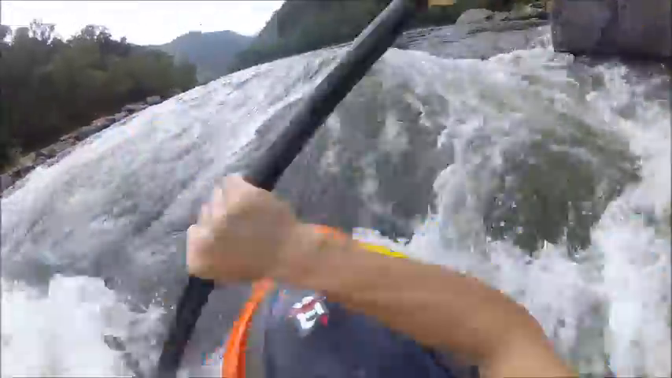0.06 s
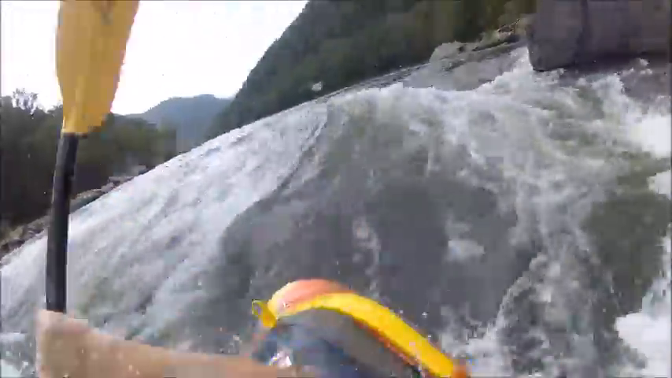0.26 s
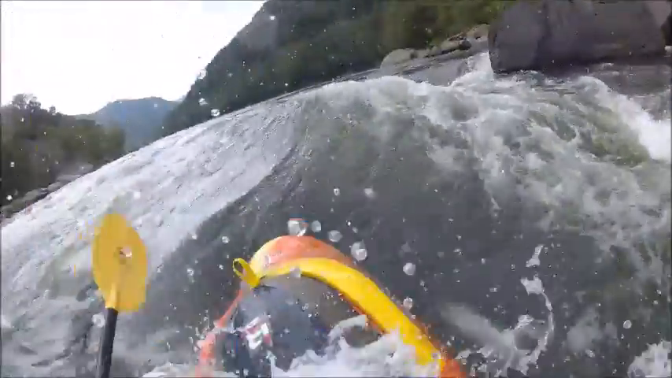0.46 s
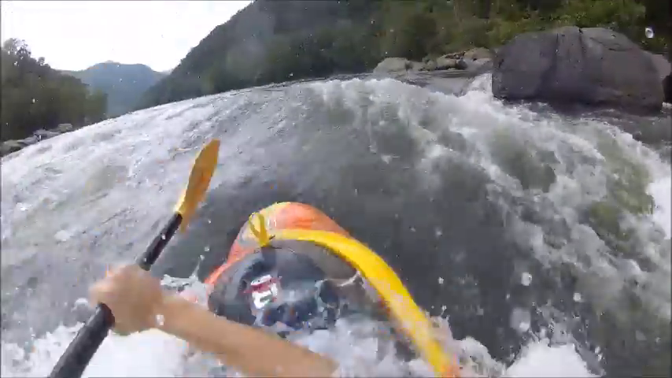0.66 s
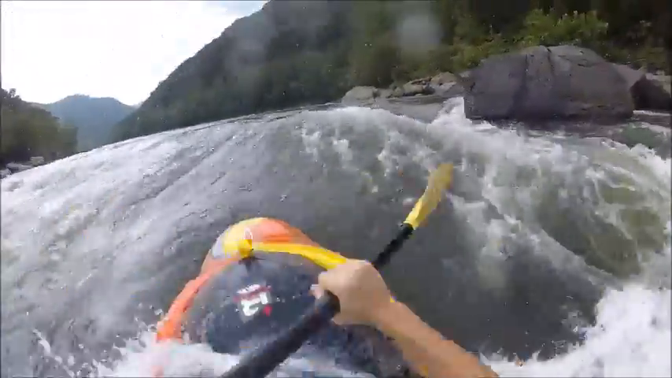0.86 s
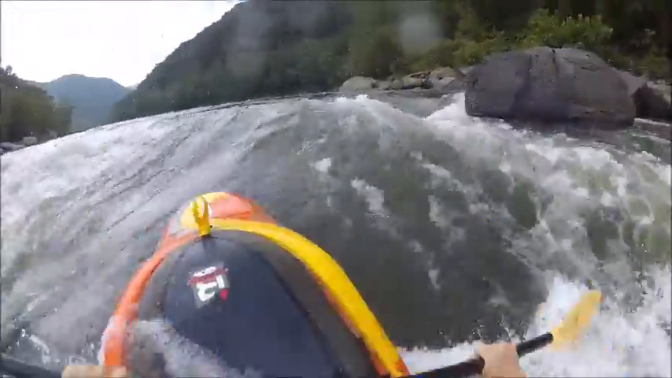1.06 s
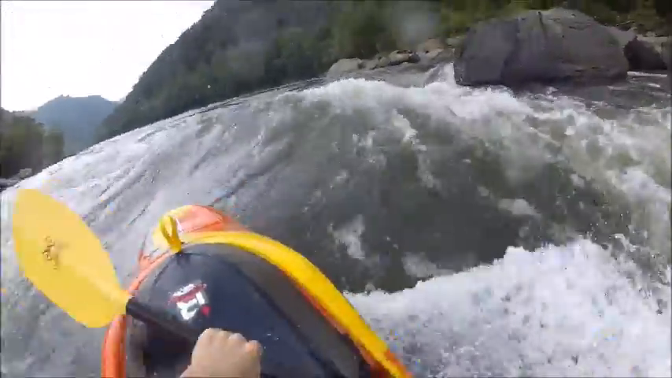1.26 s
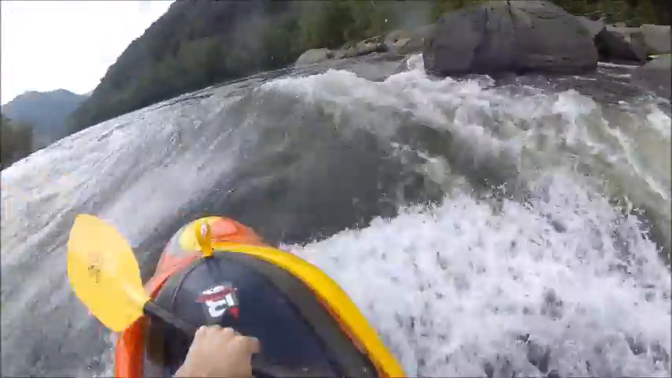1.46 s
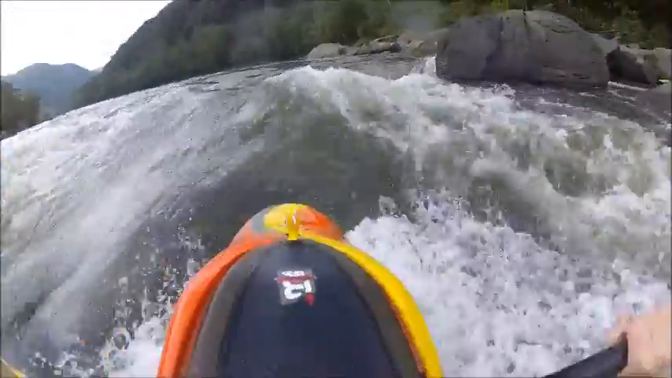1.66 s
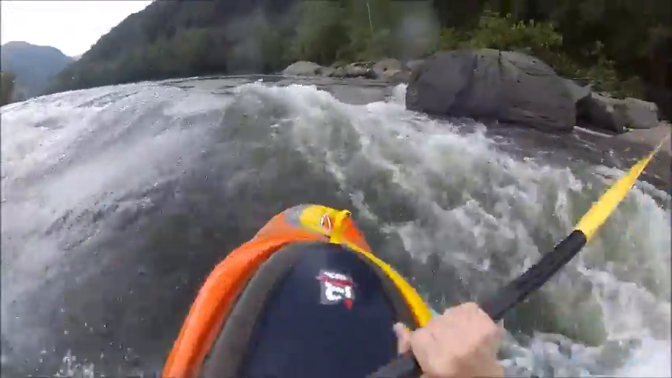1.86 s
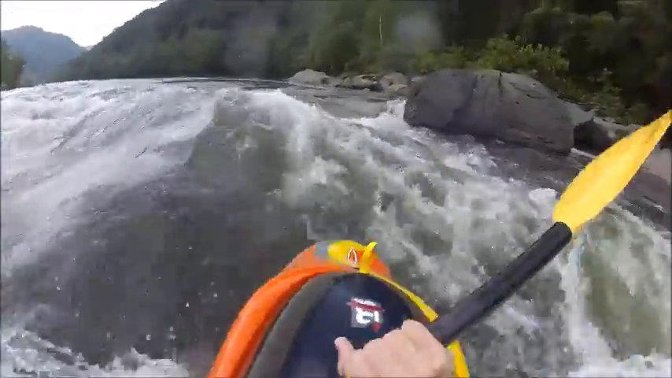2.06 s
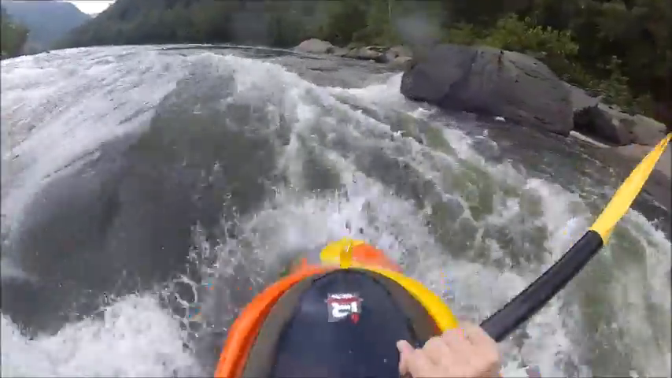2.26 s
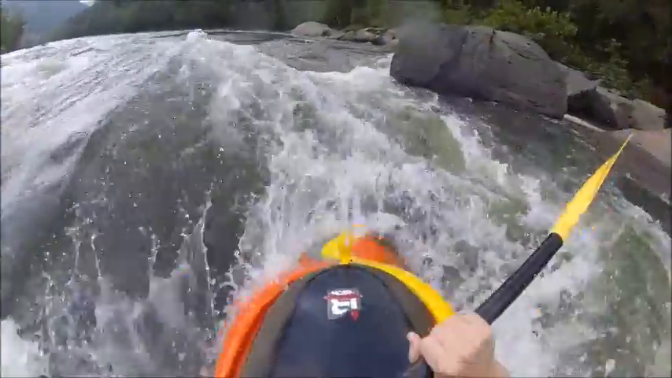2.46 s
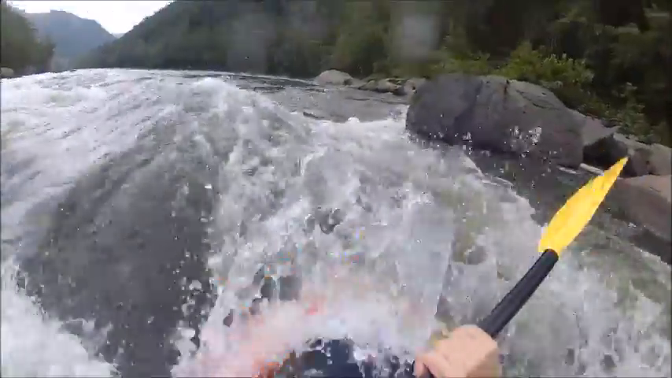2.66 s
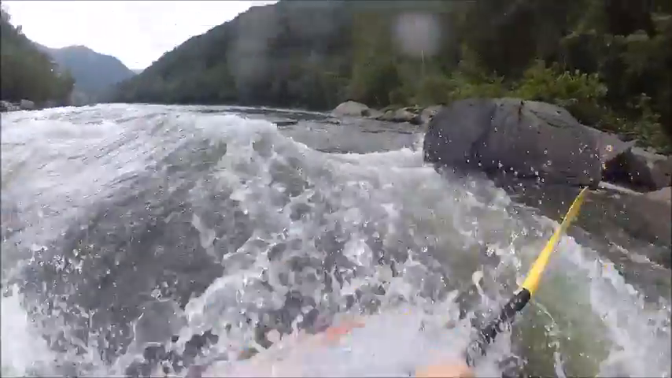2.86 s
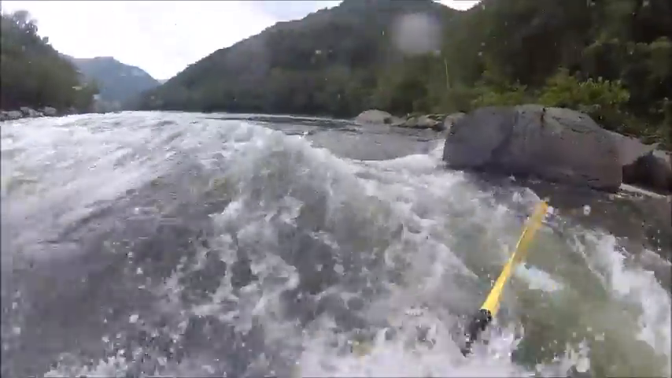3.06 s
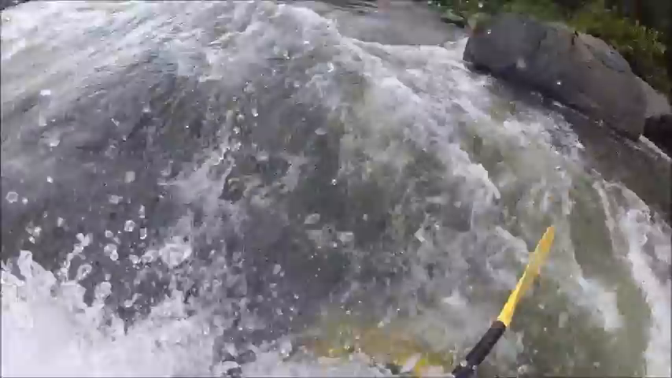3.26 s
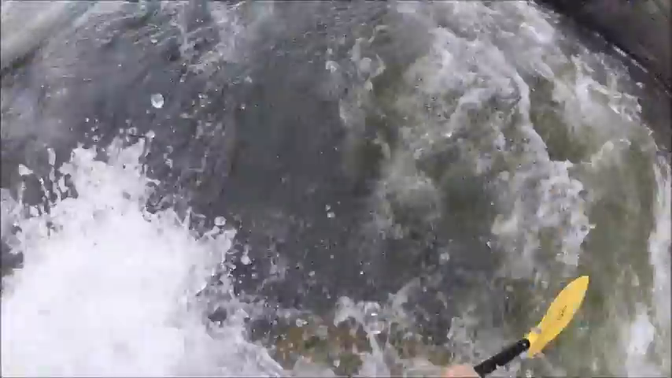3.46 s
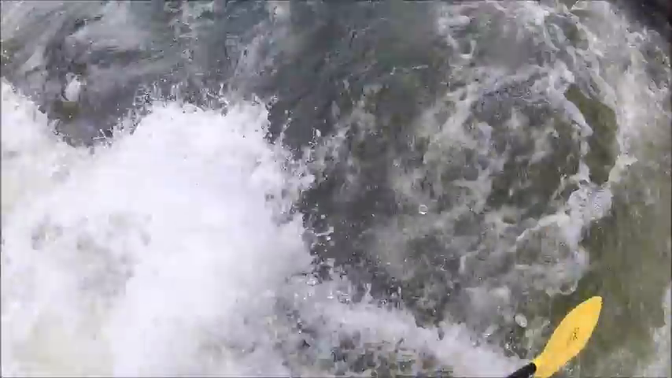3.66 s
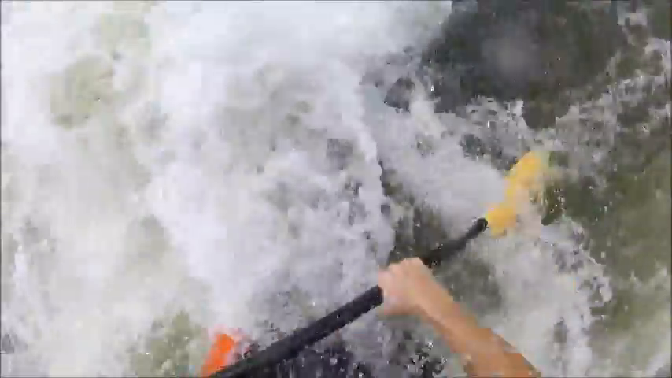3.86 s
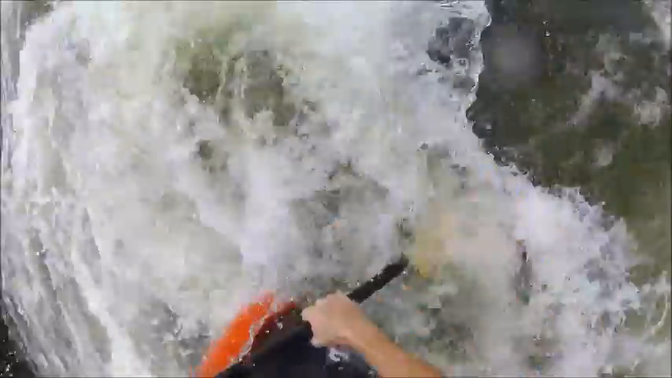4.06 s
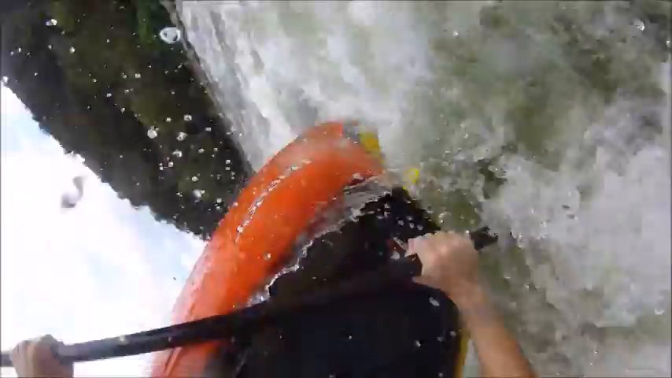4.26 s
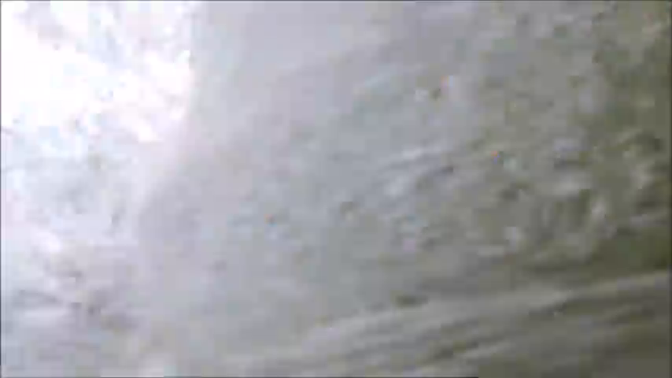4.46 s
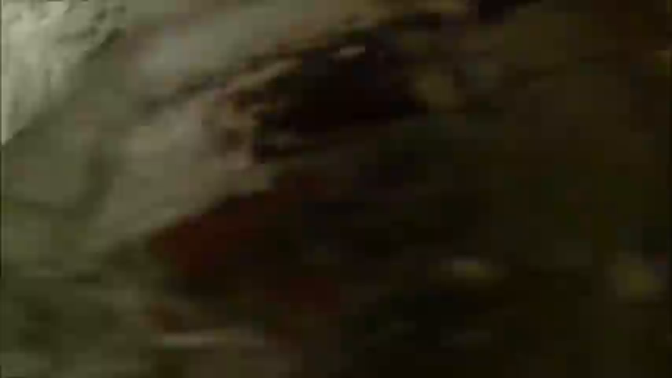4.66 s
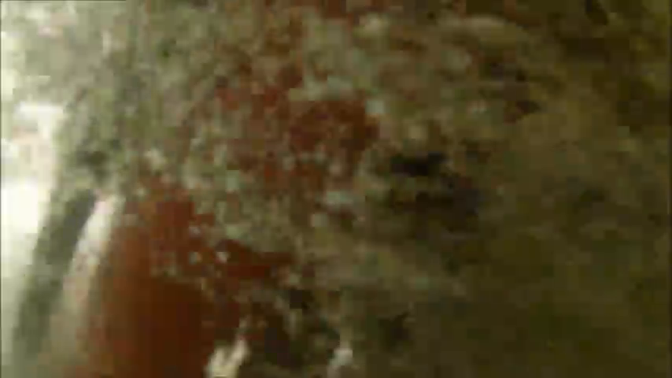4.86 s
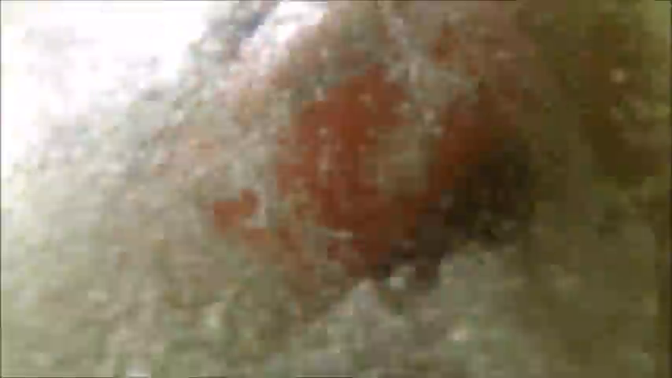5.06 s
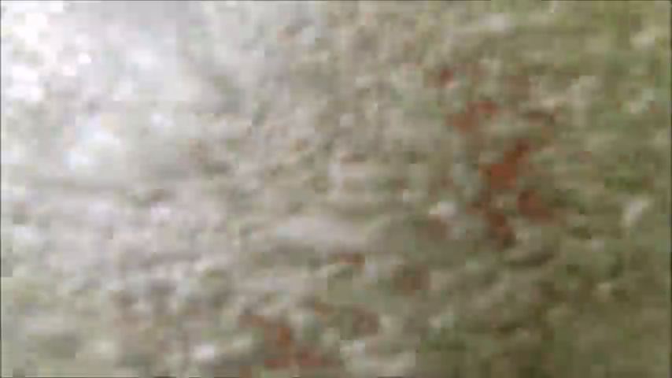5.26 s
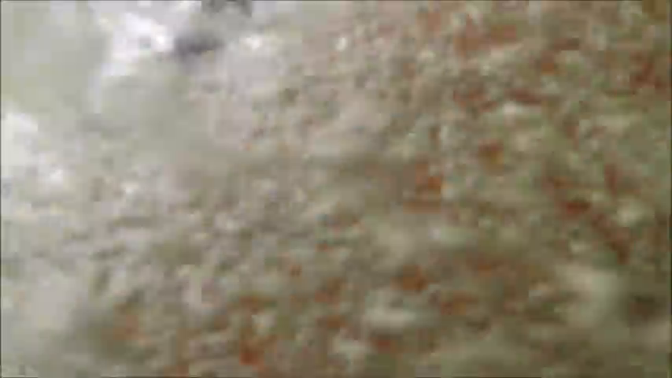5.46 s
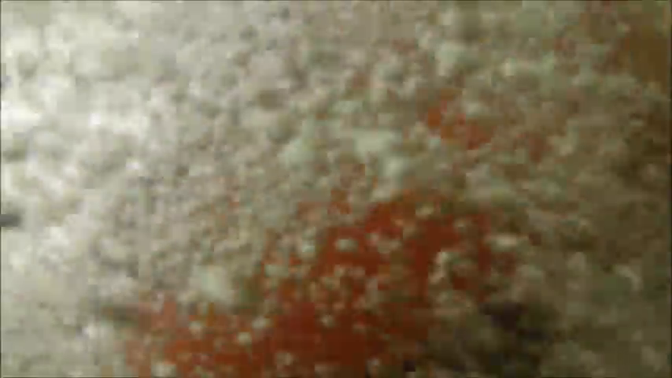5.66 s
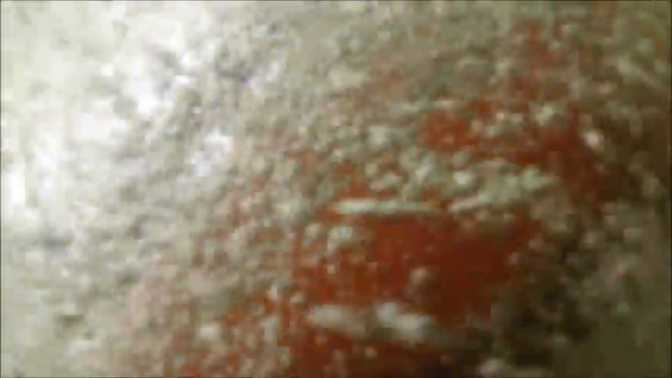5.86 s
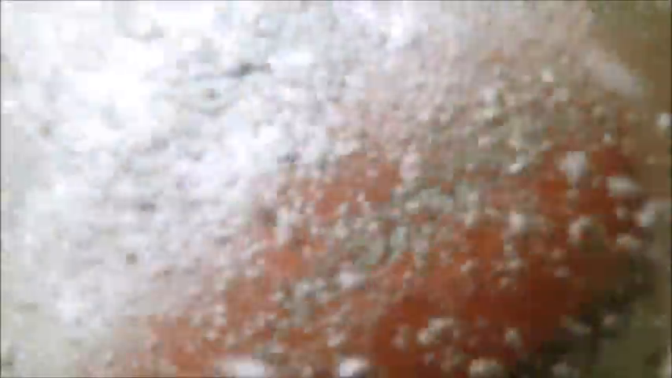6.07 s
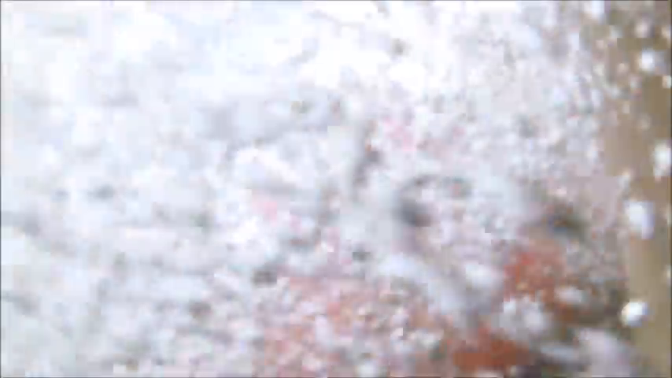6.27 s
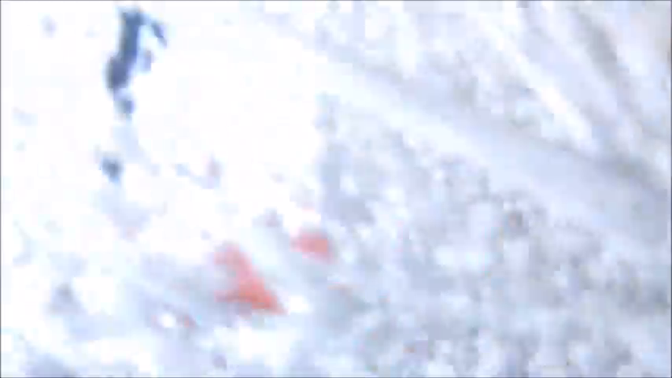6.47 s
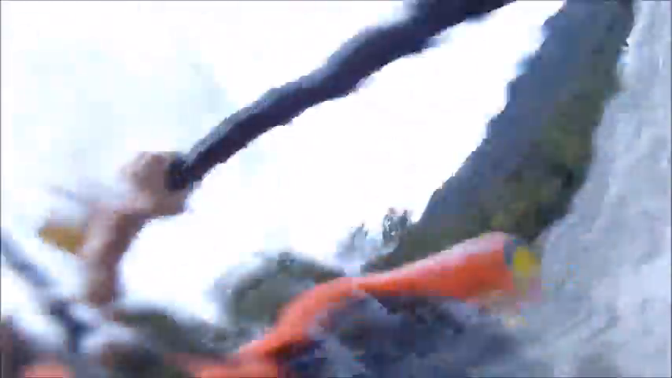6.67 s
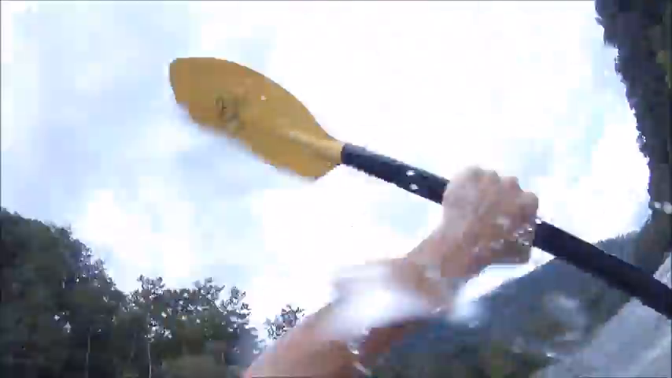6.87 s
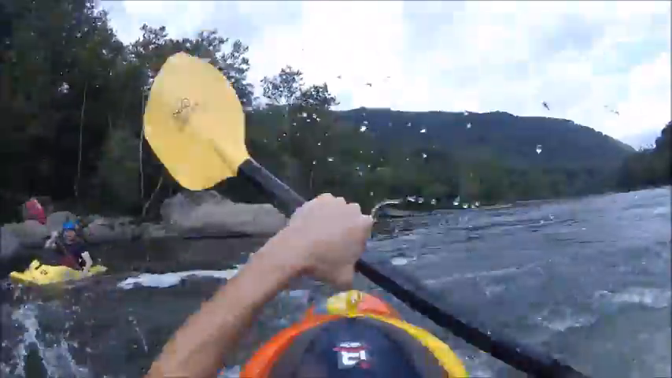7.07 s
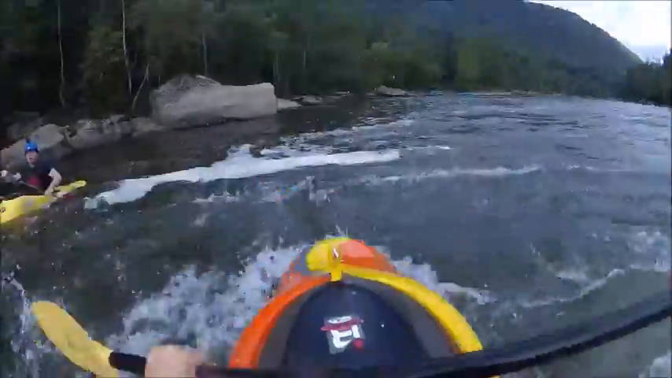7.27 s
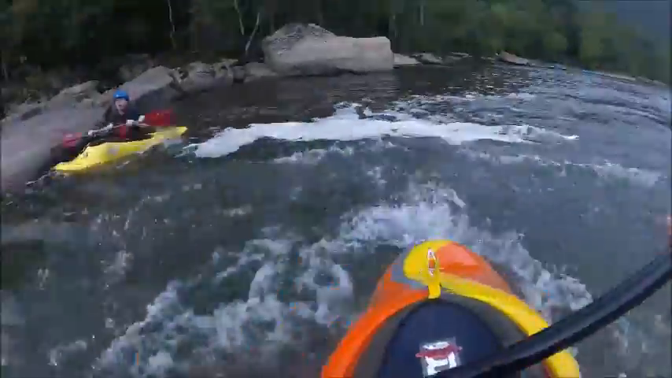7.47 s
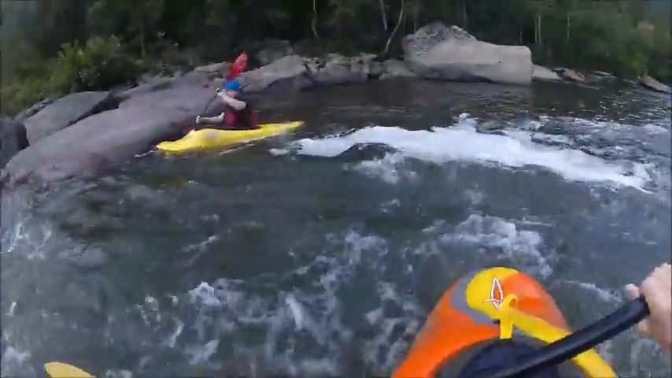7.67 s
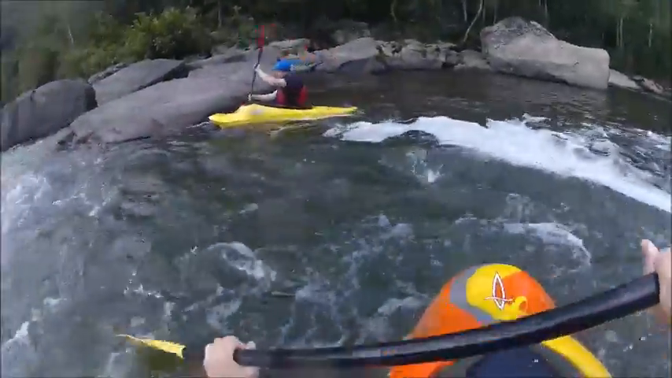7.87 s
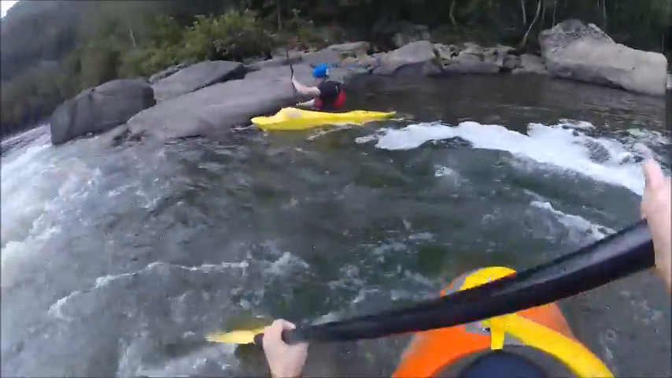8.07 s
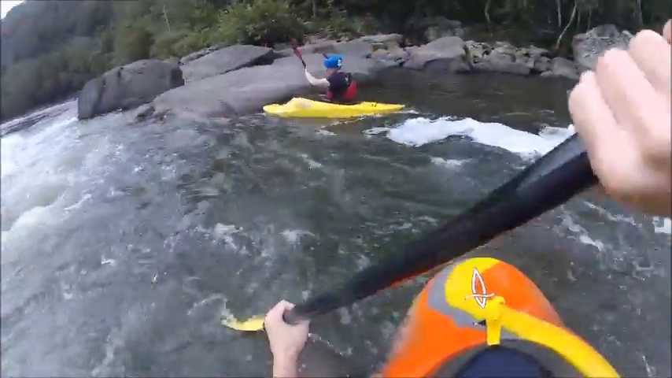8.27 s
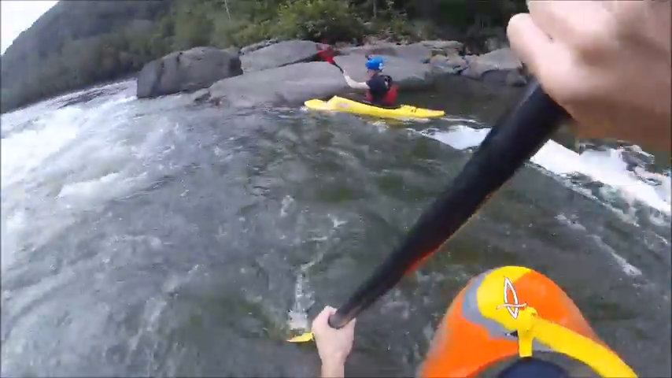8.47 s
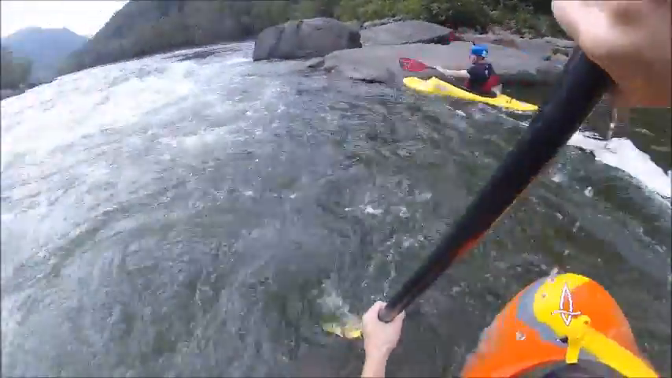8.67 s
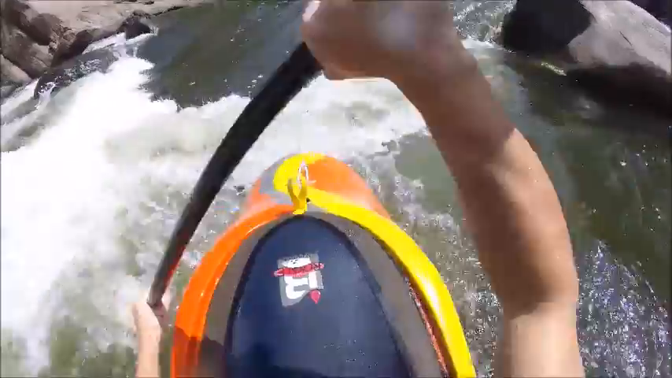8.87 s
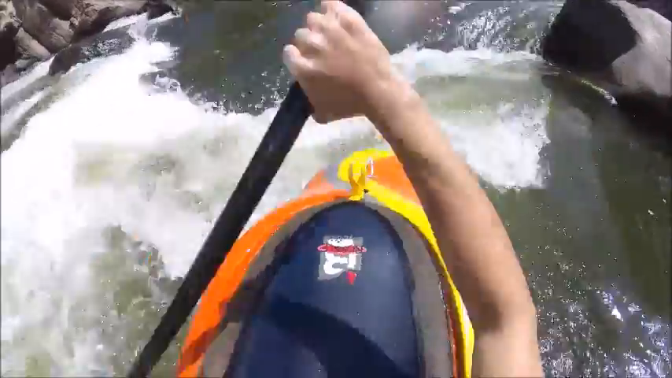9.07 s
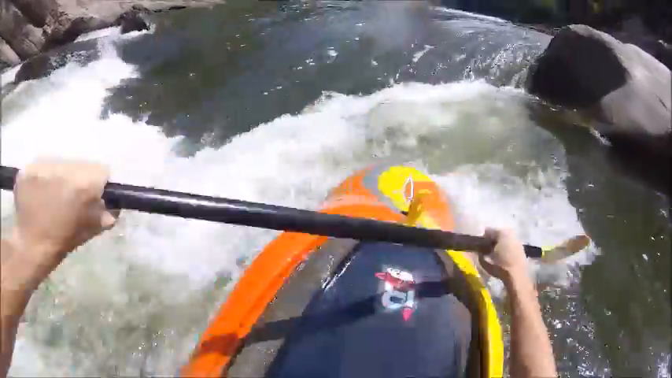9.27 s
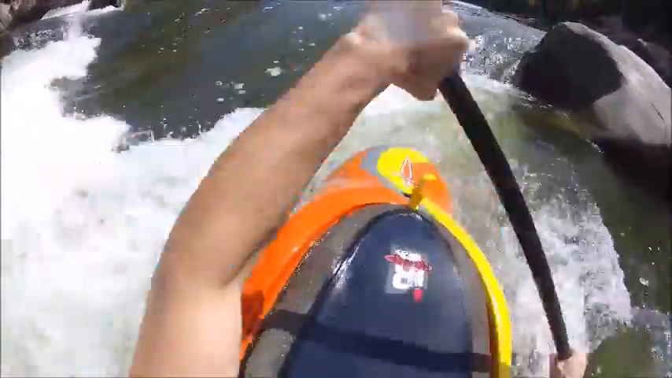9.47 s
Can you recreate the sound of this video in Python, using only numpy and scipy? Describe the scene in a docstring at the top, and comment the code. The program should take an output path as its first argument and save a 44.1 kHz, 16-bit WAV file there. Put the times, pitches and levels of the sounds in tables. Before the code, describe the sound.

From the start, a whitewater rapid roars and hisses close around a kayak, with short splashes of spray pattering over the deck again and again. At about 4.4 seconds the boat capsizes and the roar cuts off. Underwater, turbulence slaps the camera's microphone in quick, irregular, fizzy rattling bursts, with gurgling bubbles swelling around 4.8 and 6.1 seconds. At 6.6 seconds the rattling stops as the boat rolls up. Until about 7.3 seconds, water pours off in another short rattle, with a few slaps and glugs separated by near silence. From 7.4 seconds the river is back, quieter and duller through the wet microphone, slowly growing, while scattered drops tap and bump the housing. Near 8.7 seconds a film of water briefly muffles it further. At 8.8 seconds it clears, and the rapid rushes bright and loud to the end, around 9.5 seconds.

```python
"""Kayak roll in a rapid.

Whitewater roars, bubbles and sprays around the paddler's small waterproof camera. The boat capsizes;
turbulence slaps the submerged microphone port in rattling bursts and stirs bubbles. After the roll
the port glugs and drops tap the housing. A film of water seals, then muffles the port, until it
clears and the rapid is bright again."""
import sys
import numpy as np
from scipy import signal
from scipy.fft import rfft, irfft, next_fast_len
from scipy.io import wavfile
from scipy.ndimage import uniform_filter1d

SR = 44100
rng = np.random.default_rng(int(sys.argv[2]) if len(sys.argv) > 2 else 0)


def put_to_file(sound):
    """Save the sound as 16-bit audio at rate SR, in the file named by the first command-line argument."""
    columns = np.atleast_2d(sound).T  # one column per channel
    safe = np.clip(columns, -1, 1)
    whole_steps = np.round(safe * 32767)
    wavfile.write(sys.argv[1], SR, whole_steps.astype(np.int16))


N = 419391
TIME_S = np.arange(N) / SR

# Rapid before the dive, after clearing, and through the wet port.
# Each row: time in seconds, roar below 2 kHz in dB, spray above 2 kHz in dB.
RUN_IN_LEVELS = [(0.0, -26.5, -24), (0.57, -23.5, -24.5), (1.42, -24.5, -22), (1.54, -24, -24),
                 (3.56, -24, -23.5), (3.79, -27, -20.5), (4.36, -25, -20)]
RUN_OUT_LEVELS = [(8.84, -29, -25.5), (9.336, -26, -23), (9.42, -24.5, -22.5)]
WET_LEVELS = [(7.36, -39, -41), (7.8, -37.5, -39.5), (8.25, -34, -36.5), (8.31, -34, -41),
              (8.66, -33.5, -35.5)]
# Spectra. Each row: frequency in Hz, density in dB.
OPEN_AIR_SPECTRUM = [(24, -68.5), (40, -50), (64, -41), (354, -9.5), (585, -4.5), (1090, -1), (2210, -2),
                     (2700, -0.5), (4930, -4), (5580, -7.5), (6330, -6.5), (7540, -14.5), (8340, -22),
                     (12500, -31.5), (16000, -50.5)]
WET_SPECTRUM = [(18, -76), (30, -50), (141, -27.5), (569, -6.5), (649, -7), (760, -5), (844, -4),
                (913, -1.5), (2170, -5), (4080, -11.5), (6900, -22), (8080, -27), (16000, -40)]
FLOODED_SPECTRUM = [(24, -83), (40, -53), (320, -18), (680, -6), (831, -4), (896, -4), (2150, -10.5),
                    (3560, -14), (5440, -25), (16000, -47)]
GURGLE_SPECTRUM = [(40, -24), (170, -15), (400, -8), (720, 0), (1100, -7), (1600, -15), (2600, -16),
                   (3200, -27), (4200, -28), (6000, -43), (16000, -54)]
SEALED_SPECTRUM = [(40, -20), (170, -11), (550, 0), (1050, -1), (1500, -9), (2400, -7), (4000, -18),
                   (16000, -26)]
# Turbulence on the port.
# Each row: start in seconds, length in seconds, level in dB, flap pitch in Hz, brightness in dB.
SURGES = [(4.4, 0.027, -16, 1986, -8), (4.429, .014, -17.5, 3220, 2), (4.454, 0.036, -19, 1596, -7.5),
          (4.4995, 0.012, -16.5, 1830, -12), (4.521, 0.071, -16, 1318, -9),
          (4.592, .039, -12.5, 1403, -9.5), (4.636, .016, -18, 1450, -7), (4.657, .013, -12.5, 1463, -7),
          (4.677, 0.041, -21.5, 1404, -7.5), (4.732, 0.032, -17, 1452, -5.5), (4.768, .085, -15, 1399, -5),
          (4.854, 0.062, -13, 1353, -6.5), (4.9187, 0.028, -16, 1476, -5.5), (4.949, 0.045, -16, 1314, -11),
          (5.008, 0.051, -17.5, 1350, -9.5), (5.068, 0.091, -14.8, 1269, -11.5),
          (5.187, 0.06, -19, 1187, -12.5), (5.2648, .09, -15, 1368, -12.5), (5.37, 0.055, -19, 1323, -12.5),
          (5.437, 0.023, -14.5, 1140, -13), (5.563, 0.03, -16, 1534, -14), (5.6, 0.037, -13, 1287, -7.5),
          (5.751, .061, -19.5, 1040, -15), (5.816, 0.037, -14.5, 1380, -12),
          (5.8662, .019, -14, 1217, -12.5), (5.894, 0.043, -19, 1406, -13.5),
          (5.945, 0.041, -15, 1300, -13), (6.042, 0.012, -13.5, 1876, -6.5),
          (6.062, 0.094, -19, 1122, -15.5), (6.163, .021, -15, 1430, -15), (6.196, 0.037, -21, 1046, -19),
          (6.2508, 0.023, -20, 973, -20), (6.2868, 0.021, -21, 964, -17),
          (6.314, 0.039, -17.5, 1283, -12.5), (6.4, .041, -14.5, 1570, -11),
          (6.441, .076, -16.3, 1354, -11.5), (6.525, 0.04, -14.5, 1440, -11.5)]
# Single slaps in the lulls. Each row: start in seconds, level in dB, flap pitch in Hz.
LONE_SLAPS = [(5.1668, -12.5, 1510), (5.481, -16.5, 1320), (5.4888, -18, 1270), (5.51, -30, 1400),
              (5.524, -30, 1600), (5.5415, -20, 1610), (5.662, -19, 1130), (5.691, -19, 1090),
              (5.717, -19.5, 1000), (6, -21, 1580), (6.01, -11.5, 1250), (6.027, -17, 1700),
              (6.374, -15, 1080), (6.382, -14.5, 1200), (6.591, -18, 1040), (6.598, -18.5, 1050),
              (6.7937, -27.5, 994), (6.837, -14.5, 1530), (7.027, -25, 900), (7.0425, -18.5, 900),
              (7.136, -14, 1500), (7.14, -19.5, 1150)]
# Spray over the deck. Each row: start in seconds, end in seconds, level in dB.
SPLASHES = [(0.084, .2, -23), (0.618, 0.739, -26), (0.883, 0.933, -22), (1.3, 1.553, -28),
            (2.628, 2.794, -24), (2.885, 2.982, -22), (3.156, 3.267, -26), (3.562, 3.658, -22),
            (3.934, 4.028, -23.5), (4.16, 4.239, -20), (4.418, 4.445, -14.5)]
# Drop strikes and dull bumps on the housing.
# Each row: start in seconds, level before filtering in dB, pitch in Hz, decay in seconds.
DROP_TAPS = [(7.1365, -5, 1060, 0.0037), (7.1372, -12, 2020, 0.0025), (7.8795, -13, 1910, .0008),
             (7.8895, -9, 2420, 0.0011), (7.8972, -4, 1610, 0.00022), (8.3345, -8, 1200, 0.00078),
             (8.3352, -13, 2940, 0.00087), (8.444, -11, 2520, 0.0007), (8.6548, -6, 2230, .0006),
             (8.671, 0, 1710, 0.00064)]
BUMPS = [(7.351, -28.5, 191, 0.0036), (7.888, -43, 149, 0.014), (8.276, -34, 150, 0.0081),
         (8.288, -42, 110, 0.01), (8.31, -46, 80, .03), (8.334, -20.5, 430, 0.0042), (8.38, -51, 90, .03),
         (8.445, -51, 130, 0.014), (8.671, -46, 120, 0.0087)]
# Bubbling stirred by surges. Each row: time in seconds, level in dB.
BUBBLING_LEVELS = [(4.45, -39), (4.7, -37.5), (4.8, -27.5), (5.15, -31), (5.3, -39), (5.95, -38),
                   (6.13, -26.5), (6.25, -33.5), (6.6, -42)]
# Water in the port after the roll. Each row: start in seconds, end in seconds, level in dB.
GLUGS = [(6.876, 7.062, -30.5), (7.067, 7.103, -33.5), (7.121, 7.21, -40), (7.261, 7.335, -38.5)]

DIVE_S, SURFACE_S = 4.444, 6.606
DRAIN_S, FLOOD_S, CLEAR_S = 7.351, 8.676, 8.822
TYPICAL_SURGE_HZ, TYPICAL_SURGE_DB = 1300, -15


def river(dip_s=(8.289, 8.299), dip_db=-25, flooded_db=-39):
    """The rapid through a clear, wet or flooded port; the wet level dips once, briefly."""
    water = whitewater()
    run_levels = np.vstack([RUN_IN_LEVELS, RUN_OUT_LEVELS])
    clear = rapid(water, OPEN_AIR_SPECTRUM, run_levels) * (1 - gate(DIVE_S, CLEAR_S))
    wet = rapid(water, WET_SPECTRUM, WET_LEVELS) * gate(DRAIN_S, FLOOD_S) * undb(dip_db * gate(*dip_s))
    flooded = colour(water, FLOODED_SPECTRUM) * undb(flooded_db) * gate(FLOOD_S, CLEAR_S)
    return clear + wet + flooded


def rapid(water, spectrum, levels):
    """Roaring holes and hissing crests swell as the boat passes."""
    sound = colour(water, spectrum)
    roar = signal.sosfiltfilt(signal.butter(6, 2000, fs=SR, output="sos"), sound)
    times_s, roar_db, spray_db = np.transpose(levels)
    spray = unit(sound - roar) * undb(np.interp(TIME_S, times_s, spray_db))
    return unit(roar) * undb(np.interp(TIME_S, times_s, roar_db)) + spray


def whitewater(churn_db=0.63, flicker_db=1.27, bubble_db=-13, drop_db=-13):
    """Far bubbles merge into a wash whose octaves surge; near bubbles and drops stand out."""
    rest, wash = rng.standard_normal(N), 0
    for hz in 250 * 2 ** np.arange(6):
        band = signal.sosfiltfilt(signal.butter(2, hz, fs=SR, output="sos"), rest)
        rest = rest - band
        wash = wash + band * undb(churn_db * wander(9) + flicker_db * wander(45))
    wash = wash + rest * undb(flicker_db * wander(40))
    near = bubbles(low_hz=443, high_hz=6960, q=9.5, spread_db=3, glide=.17)
    return unit(wash) + undb(bubble_db) * near + undb(drop_db) * droplets(spread_db=-1.5)


def port_rattle(ring_hz=2250, ring_db=-22, fizz_db=2, size=9000):
    """Each burst of flaps knocks in the flooded port and fizzes."""
    out = np.zeros(N + size)
    for start_s, length_s, db, hz, bright_db in pour_off() + lone_slaps() + list(SURGES):
        pulses = flaps(length_s, db, hz, size)
        knock = resonate(pulses, 0.56 * hz, q=0.45) + undb(ring_db) * resonate(pulses, ring_hz, q=13)
        knock = butter(butter(knock, 2.57 * hz, "low"), 0.15 * hz, "high", order=1)
        burst = unit(knock) + undb(bright_db + fizz_db) * unit(fizz(pulses, bright_db))
        at = int(start_s * SR)
        out[at:at + size] += burst * undb(db) * np.sqrt(length_s * SR / size)
    return out[:N]


def flaps(length_s, db, hz, size, base_gap_s=.0021, base_stall_s=.002, count=160):
    """The membrane deflects and snaps back; strong surges flap faster, weak ones stall longer."""
    timing, swing, strength, side = rng.standard_normal((4, count))
    drive = 2 ** ((db - TYPICAL_SURGE_DB) / 3.5)
    hurry = max(drive, 1)
    stalls_s = (rng.random(count) < .15 / hurry ** 2) * base_stall_s / drive
    mid_gap_s = base_gap_s / hurry * (TYPICAL_SURGE_HZ / hz) ** .5
    gaps_s = mid_gap_s * np.exp(.45 / hurry * timing) + stalls_s
    push_s = np.cumsum(gaps_s) - gaps_s[0]
    snap_s = push_s + .55 / hz * np.exp(0.44 * swing)  # about half a cycle later
    live = push_s < max(length_s - .0009, .0001)
    force = undb(1.9 * strength) * live * np.sign(side + .5)
    push = np.bincount(np.minimum(push_s * SR, size - 1).astype(int), force, size)
    snap = np.bincount(np.minimum(snap_s * SR, size - 1).astype(int), force, size)
    return push - 1.21 * snap


def fizz(pulses, bright_db, scatter_db=4.2, decay_s=0.00051, tail_s=0.0058, tail_db=-24):
    """Each flap tears off a sharp fizz with a faint tail; hard flaps give far more."""
    hardness = pulses ** 2 * undb(scatter_db * rng.standard_normal(len(pulses)))
    envelope = fade(hardness, decay_s) + undb(tail_db) * fade(hardness, tail_s)
    tear = envelope * rng.standard_normal(len(pulses))
    hiss = butter(2.9 * hardness * np.sign(pulses) + tear, 2100, "high")
    hiss = butter(hiss, 4200 * undb(0.7 * (bright_db - 5.5)), "low", order=1)
    return butter(hiss, 15000 * undb(0.71 * (bright_db + 5)), "low", order=1)


def lone_slaps(length_s=0.00325, bright_db=-14, db_per_octave=16):
    """Single slaps as SURGES rows; sharper ones fizz more."""
    return [(start_s, length_s, db, hz, bright_db + db_per_octave * np.log2(hz / TYPICAL_SURGE_HZ))
            for start_s, db, hz in LONE_SLAPS]


def pour_off(start_s=6.886, step_s=.025, hold_s=.02, db=-13, hz=1172, bright_db=-18.5):
    """Water pours off the righting boat: the rattle holds, then fades and sags. Gives SURGES rows."""
    fall_db_per_s, sag_octaves_per_s = 188.5, 11
    ages_s = np.arange(5) * step_s
    ebb_s = np.maximum(ages_s - hold_s, 0)
    levels_db = db - fall_db_per_s * ebb_s
    pitches_hz = hz / 2 ** (sag_octaves_per_s * ebb_s)
    return [(start_s + age_s, step_s, level_db, pitch_hz, bright_db)
            for age_s, level_db, pitch_hz in zip(ages_s, levels_db, pitches_hz)]


def splashes(rise_s=0.019):
    """Sheets of spray land as a patter that builds fast and stops short."""
    patter = droplets(spread_db=2) + rng.standard_normal(N)
    patter = unit(butter(butter(patter, 1500, "high", order=1), 5140, "low", order=6))
    swell = sum(undb(db) * gate(start_s, end_s) * np.clip((TIME_S - start_s) / rise_s, 0, 1) ** .5
                for start_s, end_s, db in SPLASHES)
    return patter * swell


def housing_knocks(blows, size=6000):
    """One heavily damped ring of the housing per blow."""
    out, age_s = np.zeros(N + size), np.arange(size) / SR
    for start_s, db, hz, decay_s in blows:
        ring = np.sin(2 * np.pi * hz * age_s) * np.exp(-age_s / decay_s)
        at = int(start_s * SR)
        out[at:at + size] += undb(db) * butter(butter(ring, 2 * hz, "low"), 2 * hz, "low")
    return out[:N]


def gurgling(linger_s=0.016, lull_db=-60.5, tick_db=-30):
    """Surges stir bubble clouds; after the roll, draining water glugs and ticks in the port."""
    cloud = bubbles(low_hz=440, high_hz=2740, q=3.4, spread_db=3.5, glide=0.13, count=6000, size=800)
    gurgle = colour(cloud + rng.standard_normal(N), GURGLE_SPECTRUM) * undb(2 * wander(70))
    surging = sum(gate(start_s, start_s + length_s) for start_s, length_s, *_ in SURGES)
    stirred = fade(surging, linger_s) / (linger_s * SR)
    stirred *= undb(np.interp(TIME_S, *np.transpose(BUBBLING_LEVELS)))
    lull = undb(lull_db) * gate(DIVE_S, SURFACE_S)
    draining = unit(gurgle + undb(tick_db) * droplets(spread_db=4))
    glugs = draining * sum(undb(db) * gate(start_s, end_s) for start_s, end_s, db in GLUGS)
    return gurgle * (stirred + lull) + glugs


def bubbles(low_hz, high_hz, q, spread_db, glide, count=9000, size=400):
    """Bubbles pinch off and ring briefly, rising in pitch; a few are much louder."""
    when, pitch, rank = rng.random((count, 3)).T[:, :, None]
    hz = low_hz * (high_hz / low_hz) ** pitch
    cycles = hz * np.arange(size) / SR
    age = cycles / q
    ring = np.sin(2 * np.pi * cycles * (1 + glide * np.minimum(age, 1))) * np.exp(-np.pi * age)
    strength = hz * undb(-spread_db * np.log(np.maximum(rank, .005)))
    at = (when * N).astype(int) + np.arange(size)
    return unit(np.bincount(at.ravel(), (ring * strength).ravel(), N)[:N])


def droplets(spread_db, count=14000):
    """Drops burst as tiny ticks."""
    when, rank, side = rng.random((count, 3)).T
    strength = np.sign(side - .5) * undb(-spread_db * np.log(np.maximum(rank, .003)))
    return unit(butter(np.bincount((when * N).astype(int), strength, N), 1800, "high"))


def sealed_floor(db=-73):
    """Faint steady noise, exposed while water seals the port."""
    return undb(db) * colour(rng.standard_normal(N), SEALED_SPECTRUM)


def undb(db):
    """Decibels to gain."""
    return 10 ** (np.asarray(db) / 20)


def unit(x):
    """Scale to rms 1."""
    return x / np.sqrt(np.mean(x ** 2) + 1e-18)


def butter(x, hz, kind, order=2):
    """Causal low-pass or high-pass."""
    return signal.sosfilt(signal.butter(order, min(hz, .45 * SR), kind, fs=SR, output="sos"), x)


def resonate(x, hz, q):
    """One resonance, gain 1 at its centre."""
    return signal.lfilter(*signal.iirpeak(hz, q, fs=SR), x)


def colour(x, spectrum):
    """Filter by (Hz, dB) points, then scale to rms 1."""
    size = next_fast_len(N)
    hz, db = np.transpose(spectrum)
    bins_hz = np.arange(size // 2 + 1) * SR / size
    gain = undb(np.interp(np.log(bins_hz + 1), np.log(hz), db))
    return unit(irfft(rfft(x, size) * gain, size)[:N])


def wander(rate_hz):
    """Smooth random drift, rms 1."""
    hold = int(SR / rate_hz)
    return unit(uniform_filter1d(np.repeat(rng.standard_normal(N // hold + 1), hold), hold)[:N])


def gate(start_s, end_s):
    """1 from start to end, with 1 ms edges."""
    return np.clip(np.minimum(TIME_S - start_s, end_s - TIME_S) * 1000 + .5, 0, 1)


def fade(x, decay_s):
    """Give every pulse an exponential tail."""
    return signal.lfilter([1], [1, -np.exp(-1 / (decay_s * SR))], x)


def scene():
    """All sources at one microphone."""
    knocks = butter(housing_knocks(DROP_TAPS), 770, "high") + housing_knocks(BUMPS)
    return (port_rattle() + river() + splashes() + knocks + gurgling() + sealed_floor())[None]


def record(dry, ceiling=0.97, bottom_hz=45, top_hz=16000):
    """The camera rounds peaks, sheds deep bass and cuts the top."""
    rounded = dry / (1 + (dry / ceiling) ** 4) ** (1 / 4)
    thinned = butter(rounded, bottom_hz, "high", order=1)
    return signal.sosfilt(signal.ellip(8, .2, 70, top_hz, fs=SR, output="sos"), thinned)


dry = scene()
out = record(dry)
put_to_file(out)
```